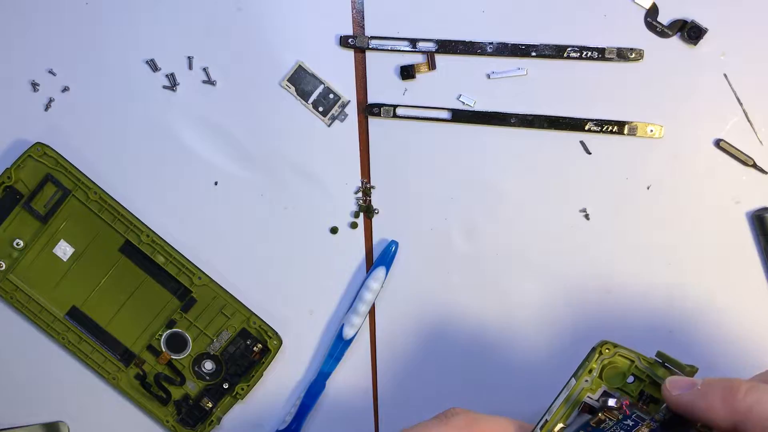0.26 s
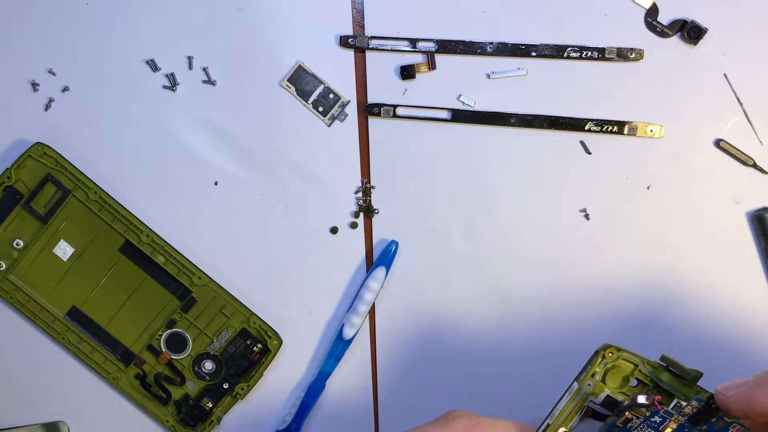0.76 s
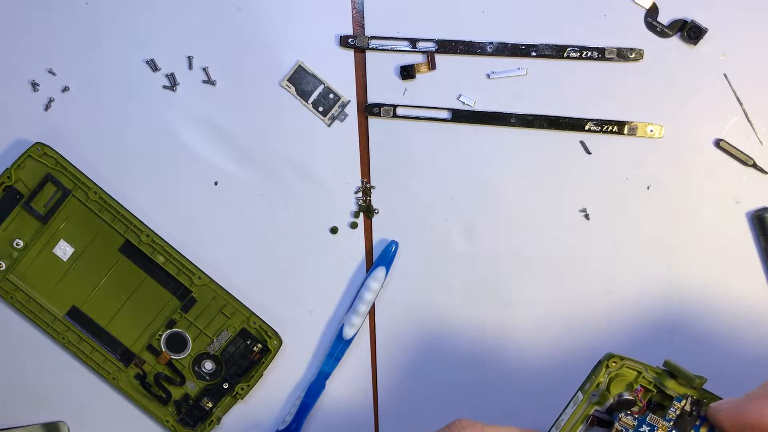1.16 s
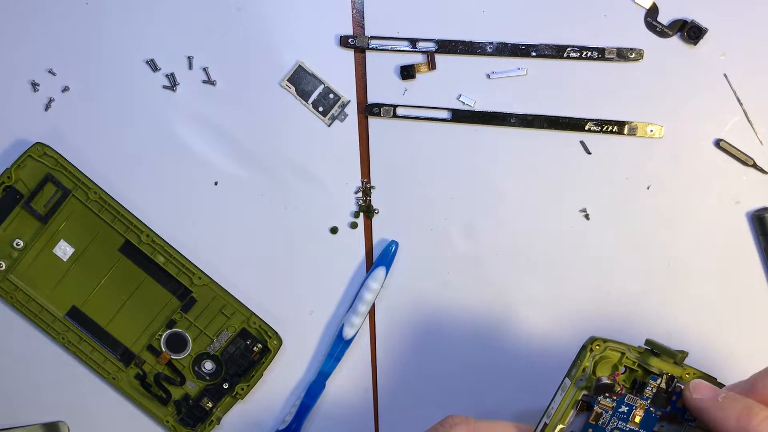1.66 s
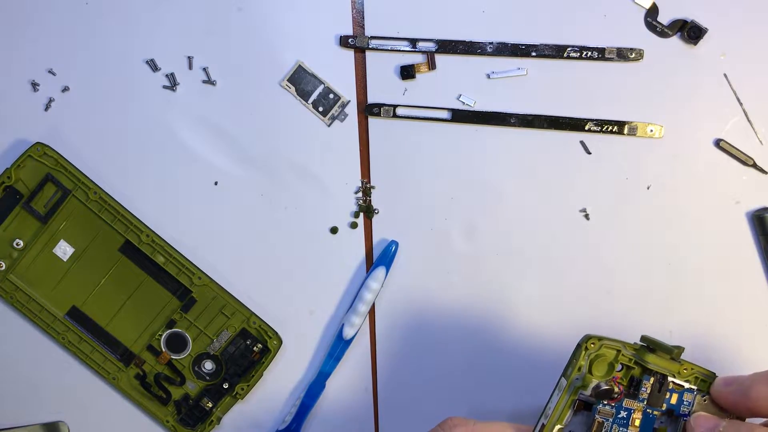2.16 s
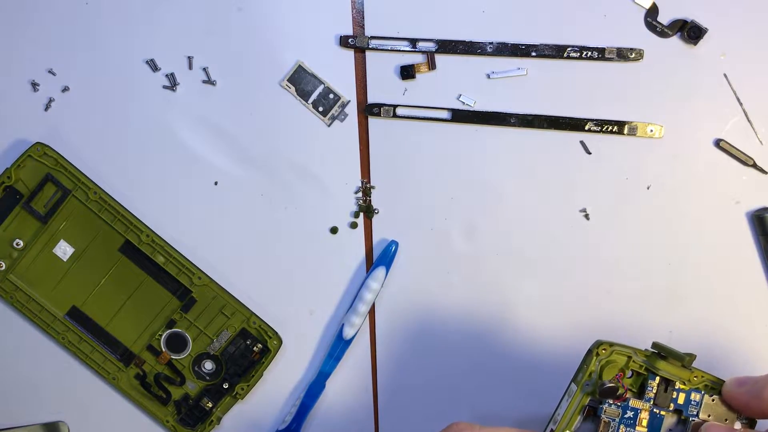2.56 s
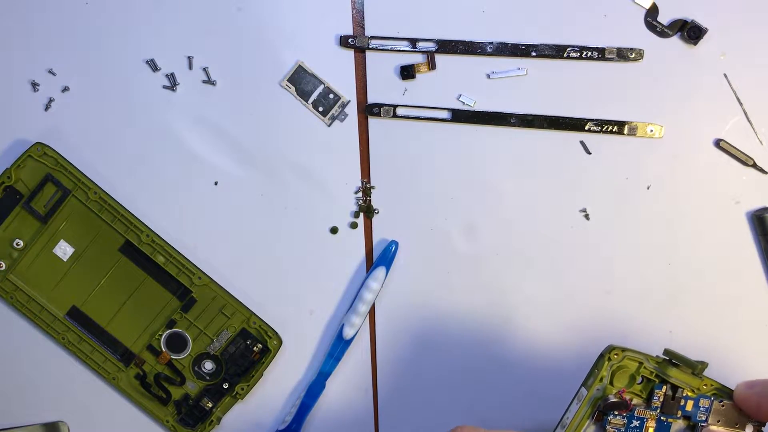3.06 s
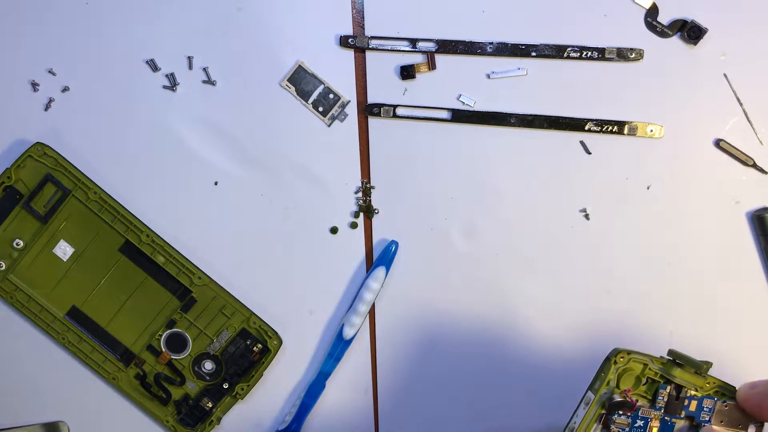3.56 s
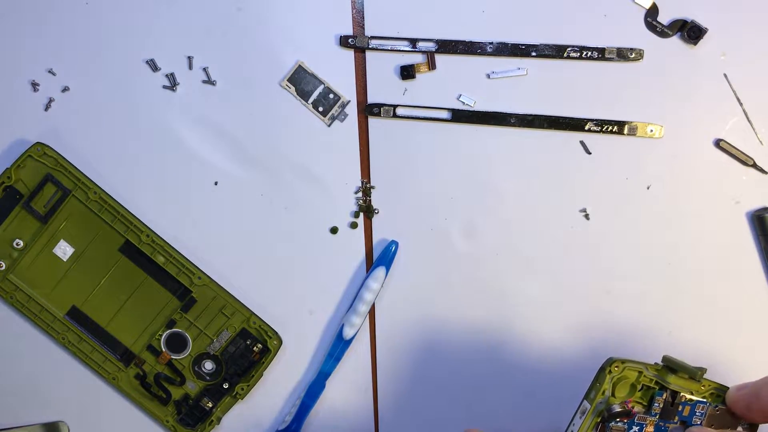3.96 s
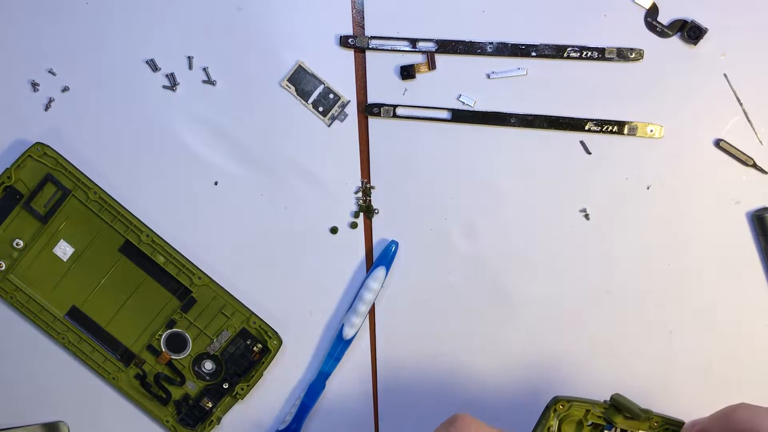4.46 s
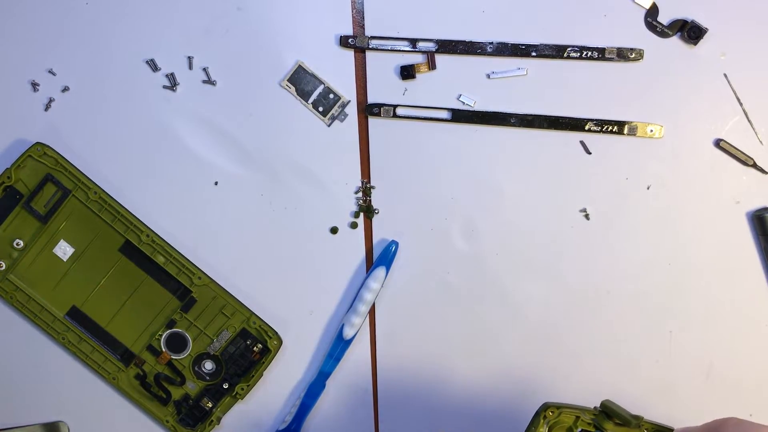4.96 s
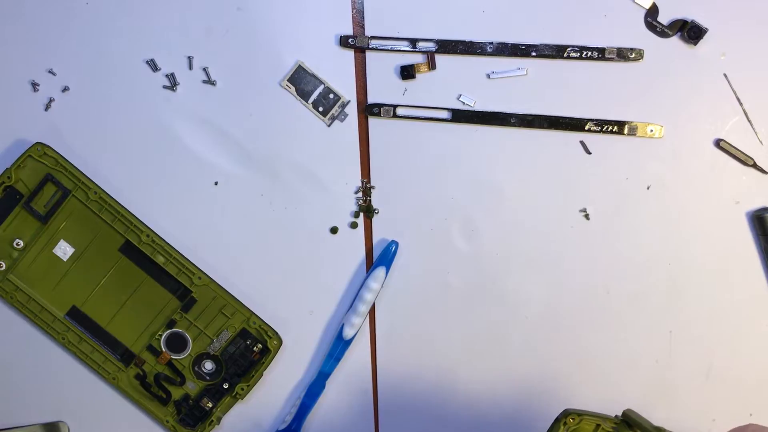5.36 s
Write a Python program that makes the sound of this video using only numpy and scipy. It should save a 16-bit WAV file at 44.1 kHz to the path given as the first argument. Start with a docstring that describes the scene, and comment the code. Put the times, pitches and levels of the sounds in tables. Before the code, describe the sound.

An opened phone is handled on a desk, close to the microphone, in a small room with little echo. A steady low electrical hum and soft hiss run throughout. A dull desk bump and a faint tick open the sound, and a few light ticks follow from 0.5 seconds. At 0.7 seconds the plastic frame lets go with one sharp snap, by far the loudest event. Fingers briefly rub the plastic as it settles with soft knocks. Small parts click in a quick cluster from 1.0 to 1.2 seconds. More ticks come between 1.6 and 2.1 seconds, mixed with short, high pings from thin metal and ending in a crisper click. From 3 seconds there are only scattered faint ticks, with soft low desk bumps around 4.1 seconds. The room noise swells slightly towards the end, at about 5.6 seconds.

```python
"""The plastic frame of an opened phone lets go with one sharp snap as its catch slips and lands.
The phone is worked by hand on a desk, close by: small parts tick against the frame, a thin metal
shield rings, the frame settles with soft knocks and fingers rub over it. Behind it are a mains hum,
the low drone of a machine, a faint electronic whine and soft room noise that swells towards the end."""
import sys
import numpy as np
from scipy import signal
from scipy.fft import rfft, irfft, next_fast_len
from scipy.io import wavfile
from scipy.ndimage import map_coordinates

SR = 44100
rng = np.random.default_rng(int(sys.argv[2]) if len(sys.argv) > 2 else 0)


def log_audio(samples):
    """Write samples as a 16-bit WAV file to the path given in sys.argv[1]."""
    # one column per channel
    frames = np.atleast_2d(samples).T
    # limit to full scale, then quantise
    limited = np.clip(frames, -1, 1)
    pcm = np.round(limited * 32767).astype(np.int16)
    wavfile.write(sys.argv[1], SR, pcm)


N = 247842
TIME = np.arange(N) / SR
RING_TIME = np.arange(SR // 4) / SR  # the quarter second in which one contact dies away


def amp(db):
    """Turn decibels into a number to multiply by."""
    return 10 ** (np.asarray(db) / 20)


def unit(x):
    """Scale a sound to an average (rms) level of 1."""
    return x / np.sqrt(np.mean(x ** 2) + 1e-20)


def fade(t, fade_s):
    """Die away by 60 dB in fade_s seconds; every fade time here means this."""
    return np.exp(-np.log(1000) * t / np.maximum(fade_s, 1e-3))


def along(points, hz):
    """Read between (frequency, value) points, giving each octave equal room."""
    freqs, values = np.transpose(points)
    return np.interp(np.log(hz + 1), np.log(freqs), values)


def resonances(peaks, hz, scatter_db=0):
    """The boost in dB near the pitches an object favours; scatter varies their strengths."""
    return sum((boost + scatter_db * rng.standard_normal()) / (1 + (2 * (hz - centre) / width) ** 2)
               for centre, width, boost in peaks)


def wobble(rate):
    """A smooth curve through `rate` random values a second."""
    return map_coordinates(rng.standard_normal(int(N * rate / SR) + 4), [TIME * rate])


def filtered(x, gain):
    """Multiply each frequency of a sound by gain(frequency)."""
    size = next_fast_len(len(x) + SR // 4)
    return irfft(rfft(x, size) * gain(np.fft.rfftfreq(size, 1 / SR)), size)[:len(x)]


def coloured(x, colour_db):
    """Shape the tone with no sound ahead of the hit (minimum phase), so clicks stay sharp."""
    size = 2 * next_fast_len(len(x))
    gain = amp(colour_db(np.fft.rfftfreq(size, 1 / SR)))
    cepstrum = irfft(np.log(gain + 1e-5))
    cepstrum[1:size // 2] *= 2
    cepstrum[size // 2 + 1:] = 0
    return irfft(rfft(x, size) * np.exp(rfft(cepstrum)))[:len(x)]


def noise(colour):
    """Steady noise with the given tone colour and an average level of 1."""
    return unit(filtered(rng.standard_normal(N), lambda hz: amp(along(colour, hz))))


def add(track, start_s, sound):
    """Mix a sound into the track at the given time."""
    part = track[round(start_s * SR):][:len(sound)]
    part += sound[:len(part)]


def jolt(slip_s, rattle_db, first_db):
    """The force of a contact: one clean first blow, a burst of slips and a weak, longer rattle."""
    slips = fade(RING_TIME, slip_s)
    rattle = amp(rattle_db) * fade(RING_TIME, .045)
    force = rng.standard_normal(len(RING_TIME)) * (slips + rattle)
    force /= np.linalg.norm(force)
    force[0] += amp(first_db)
    return force


def click(x):
    """Scale a click so that its energy, spread over 7 ms, has a level of 0 dB."""
    return x * np.sqrt(0.007 * SR) / np.linalg.norm(x)


def rings(knocks, notes):
    """Light knocks ring an object's own notes, each time at new strengths."""
    out = np.zeros(N)
    onset = 1 - fade(RING_TIME, 0.0026)
    for start_s, db in knocks:
        ring = sum(amp(note_db + rng.normal(0, 2.2)) * fade(RING_TIME, fade_s)
                   * np.sin(2 * np.pi * hz * RING_TIME) for hz, note_db, fade_s in notes)
        add(out, start_s, amp(db) * ring * onset)
    return out


# tone colour of the even hiss (frequency [Hz], relative level [dB])
HISS_COLOUR = [(100, -32.5), (170, -3), (295, -6), (325, -6.5), (371, -6.5), (448, -13.5), (522, -12),
               (1230, -13.5), (1350, -15), (2580, -21.5), (4830, -28.5), (5950, -27), (10500, -50),
               (14500, -45.5), (16000, -41)]
# tone colour of the distant wash (frequency [Hz], relative level [dB])
WASH_COLOUR = [(300, -18.5), (480, -7), (620, -2.5), (850, 0), (1220, -1), (1500, -6), (2200, -16),
               (4000, -25), (8000, -45.5)]
# shape of the wash's swell, before it is widened (time [s], relative level [dB])
WASH_SWELL = [(0.0, -67), (0.91, -67), (1.3, -69), (3.11, -69.5), (5.34, -66.5), (5.62, -63.5)]
# pitches the room boosts or weakens (frequency [Hz], width [Hz], boost [dB])
ROOM_PEAKS = [(619.6, 60, 4), (810, 22, 4), (1260, 29, 3), (2010, 34, 3), (6800, 570, 5), (10384, 800, -5),
              (12895, 900, 1)]
def room_noise(quietest_wash_db=-73, widen=1.6):
    """An even hiss and a distant wash that slowly swells; the room colours both."""
    swell = np.interp(TIME, *np.transpose(WASH_SWELL))
    wash = amp(quietest_wash_db + widen * (swell - swell.min())) * noise(WASH_COLOUR)
    hiss = amp(-66.5) * noise(HISS_COLOUR)
    return filtered(hiss + wash, lambda hz: amp(resonances(ROOM_PEAKS, hz)))


# mains and machine tones (frequency [Hz], average level [dB], unsteadiness [higher wavers more])
HUM_TONES = [(49.3, -60.5, 2.5), (51, -56.5, 4.5), (99.35, -52.5, 2), (145.6, -66.5, 3), (159.6, -72.5, 2),
             (197, -75, 2), (300, -79, 0.5)]
# tone colour of the machine's drone (frequency [Hz], relative level [dB])
DRONE_COLOUR = [(15, -45.5), (24, -20), (33, -5.5), (45, -3.5), (54, 4.5), (60, 0.5), (68, -9), (85, -8),
                (100, -4), (115, -6), (128, -19), (148, -14.5), (175, -24), (260, -50.5)]
def hum():
    """Mains and machine tones waver in loudness and pitch over a low drone."""
    tones = np.zeros(N)
    for hz, db, unsteadiness in HUM_TONES:
        loudness = amp(db + unsteadiness * wobble(7.0) / 2)
        phase = 2 * np.pi * (hz * TIME + rng.random())
        drift = 0.16 * unsteadiness * wobble(3.5)
        tones += loudness * np.sqrt(2) * np.sin(phase + drift)
    return tones + amp(-53.5) * noise(DRONE_COLOUR)


# thin electronic tones (frequency [Hz], average level [dB])
WHINE_TONES = [(11526, -95), (14406, -95)]
def whine():
    """The electronics sing very faintly on high, steady notes."""
    return sum(amp(db) * np.sqrt(2) * np.sin(2 * np.pi * hz * TIME) for hz, db in WHINE_TONES)


# how long the room's echo lasts (frequency [Hz], fade time [s])
ECHO_FADES = [(300, .25), (2000, .3), (7000, 0.3), (15000, .16)]
def room_echo(x):
    """The small room answers 5 ms later; the highest treble dies first."""
    hz, t, spectrum = signal.stft(rng.standard_normal(SR // 2), SR, nperseg=256)
    spectrum *= fade(t, along(ECHO_FADES, hz)[:, None])
    tail = signal.istft(spectrum, SR, nperseg=256)[1]
    tail = np.pad(tail / np.linalg.norm(tail), (SR // 200, 0))
    return signal.fftconvolve(x, tail)[:N]


# the hand shifts on the desk (time [s], level [dB], frequency [Hz])
DESK_PUSHES = [(0.017, -37, 48.7), (1.452, -44, 51.1), (4.083, -42.5, 91.9), (4.09, -45, 40),
               (4.172, -39.5, 55)]
def desk_bumps():
    """Each soft push shakes the desk for a few slow swings."""
    return sum(amp(db) * np.exp(-((TIME - s) / 0.033) ** 2) * np.sin(2 * np.pi * hz * (TIME - s))
               for s, db, hz in DESK_PUSHES)


def stroke(start_s, length_s):
    """A finger takes hold, drags evenly and lets go; a long stroke does so more gently."""
    t = TIME - start_s
    grip = np.clip(t / (.12 * length_s), 0, 1)
    release = fade(np.maximum(t - length_s, 0), 1.7 * length_s)
    return grip * release


# fingers grip, skid, scuff, turn the phone and draw it aside (start [s], length [s], level [dB])
FINGER_STROKES = [(0.49, 0.2, -68.5), (0.708, 0.06, -52), (0.78, 0.06, -60), (0.837, 0.018, -59.5),
                  (0.84, 0.32, -67.5), (2.062, 0.043, -65.5), (2.097, 0.25, -74.5), (4.85, 0.54, -78.5)]
# tone colour of skin on plastic (frequency [Hz], relative level [dB])
RUB_COLOUR = [(700, -30), (1300, -10), (2000, -4.5), (2600, -4.5), (3150, -7), (4100, -2.5), (5500, -9),
              (6500, -5), (8200, -9.5), (9600, -10), (10500, -14.5), (13000, -12), (16000, -18)]
def finger_rub():
    """Fingers drag in a fine, uneven grain that mildly sounds the same frame pitches as the snap."""
    grain = rng.standard_normal(N)
    grain *= amp(3 * rng.standard_normal(N) + 1.7 * wobble(110))
    friction = filtered(grain, lambda hz: amp(along(RUB_COLOUR, hz) + .63 * resonances(FRAME_PEAKS, hz)))
    return unit(friction) * sum(amp(db) * stroke(start, length) for start, length, db in FINGER_STROKES)


# soft knocks after the snap (time [s], level [dB])
SETTLING_KNOCKS = [(0.759, -53), (0.765, -53), (0.825, -51), (0.844, -52), (0.854, -49.5), (1.021, -51),
                   (1.031, -50)]
# the case's own notes (frequency [Hz], relative level [dB], fade time [s])
CASE_NOTES = [(1770, -8, 0.066), (2455, -3, 0.055), (4150, -1, 0.041), (6400, -2, 0.038)]
def frame_settling():
    """The frame settles in soft knocks that ring the case."""
    return rings(SETTLING_KNOCKS, CASE_NOTES)


# taps on the metal shield (time [s], level [dB])
SHIELD_TAPS = [(1.732, -58), (1.856, -60), (1.873, -57.5), (1.9276, -47), (1.973, -59), (1.983, -56),
               (2.06, -53), (2.0848, -51)]
# the shield's own notes (frequency [Hz], relative level [dB], fade time [s])
SHIELD_NOTES = [(5300, -13.5, .02), (6000, -0.5, 0.042), (6550, -5, 0.028)]
def shield_pings():
    """Light taps set a thin metal shield ringing, high and short."""
    return rings(SHIELD_TAPS, SHIELD_NOTES)


# parts drop into place (time [s], level [dB], extra body [dB], extra edge [dB], wait after touch [s])
PART_CONTACTS = [(0.0403, -58.5, 5, -2, 0.013), (0.4927, -55.5, 8.5, -9, 0.0026),
                 (0.5262, -47.5, 6, -5, 0.0042), (0.651, -59, 7, -13, 0.022), (0.6709, -58.5, 8, -16, 0),
                 (0.6838, -53, 7, -10, 0), (1.0234, -48, 12, 5.5, 0.0048), (1.0326, -56.5, 24, -6, 0.0016),
                 (1.0628, -47.5, 9, 12, 0.0058), (1.105, -60, 3, -2, 0.0041), (1.1334, -43, 12, 9, 0),
                 (1.1461, -39.5, -2, 0.5, 0), (1.19, -47, 1, -8, .0154), (1.201, -55, -1, -2.5, 0),
                 (1.653, -60, 6.5, -2, 0.0052), (1.6699, -45.5, -1.5, -2, 0.00069),
                 (1.7181, -57, 6, 0.5, 0.013), (1.7313, -58.5, -3, -10, 0.002), (1.8725, -57, 7, -5, 0.022),
                 (1.937, -62, 31, -15.5, 0), (1.9816, -59, 6.5, -1.5, 0.015), (2.0576, -37, -2, 2.5, .0034),
                 (2.0613, -44.5, 1.5, -2, 0.00057), (2.0842, -52, 0, 0, 0.0087), (3.147, -59, 3, 6, 0.0025),
                 (3.684, -63.5, 11, 4.5, 0), (3.8154, -64, 8, -1, 0.00039),
                 (4.1674, -64.5, 11.5, -5.5, 0.01), (4.194, -65, 8, -12, 0), (4.3954, -64.5, 12, 3, .017),
                 (5.0421, -60, 25, 0, 0)]
# tone colour of a tick (frequency [Hz], relative level [dB])
TICK_COLOUR = [(400, -28), (1000, -15.5), (2300, -13), (4200, -11.5), (5000, -4), (6500, -0.5), (7500, -8),
               (8700, -2.5), (10500, -7.5), (13000, -3.5), (15800, -8)]
# pitches the small parts favour (frequency [Hz], width [Hz], boost [dB])
PART_PEAKS = [(2210, 120, 7), (4590, 110, 11), (5320, 200, 7), (6006, 160, 12), (6590, 110, 8.5),
              (7960, 120, 6), (8460, 140, 7.5), (8900, 150, 6.5), (9450, 200, 8), (11400, 140, 3.5),
              (12330, 110, 8)]
def part_ticks(touch_db=-6.5):
    """Small parts touch the frame, then drop into place; firm contacts have more body, hard more edge."""
    out = np.zeros(N)
    for time_s, db, body_db, edge_db, wait_s in PART_CONTACTS:
        tilt = [(3300, body_db), (5700, 0), (8000, 0), (11000, edge_db)]  # (frequency [Hz], boost [dB])
        slip_s = .019 + .0005 * body_db  # a firm contact slips longer
        for start_s, level_db in (time_s - wait_s, db + touch_db), (time_s, db):
            force = jolt(slip_s, rattle_db=-21, first_db=-7)
            # each contact point brings out different pitches
            tick = coloured(force, lambda hz: along(TICK_COLOUR, hz) + along(tilt, hz)
                            + resonances(PART_PEAKS, hz, scatter_db=2.5))
            add(out, start_s, amp(level_db) * click(tick))
    return out


# the snap's knock on the phone's body (time [s], level [dB])
BODY_KNOCK = [(0.7031, -22.5)]
# the body's own note (frequency [Hz], relative level [dB], fade time [s])
BODY_NOTE = [(620.2, -27, .045)]
def body_thud():
    """The snap jolts the phone's body, which rings briefly on one note."""
    return rings(BODY_KNOCK, BODY_NOTE)


# the catch slips twice, then lands (time [s], level [dB], fade time of the slip [s])
CATCH_HITS = [(0.7027, -23.5, .01), (0.7031, -19.5, .014), (0.7087, -32, .025)]
# tone colour of the plastic's crack (frequency [Hz], relative level [dB])
CRACK_COLOUR = [(400, -34), (630, -20), (850, -27), (1250, -17), (1750, -16), (2450, -8.5), (3100, -13.5),
                (3950, 1), (5500, -13), (6600, -3), (8100, -11), (9300, -9), (10400, -16.5), (12400, -9),
                (15800, -18)]
# pitches the plastic frame favours (frequency [Hz], width [Hz], boost [dB])
FRAME_PEAKS = [(635, 51, 12.5), (1100, 190, 11.5), (1256, 96, 8.5), (1694, 260, 10.5), (2265, 94, 10.5),
               (2480, 150, 7), (2730, 50, 6), (3182, 60, 7.5), (3304, 60, 8), (3640, 62, 9), (3930, 110, 6),
               (4144, 90, 8), (4250, 120, 4.5), (4623, 87, 8), (4574, 60, 6), (4840, 51, 7.5),
               (5282, 90, 7), (5900, 80, 6.5), (5990, 71, 12), (6650, 97, 5.5), (6680, 80, 6.5),
               (7022, 92, 9.5), (7090, 83, 9.5), (7350, 90, 8.5), (7250, 56, 7), (9676, 230, 9),
               (11030, 110, 9), (12330, 130, 5.5), (13414, 200, 7)]
def frame_snap():
    """The catch slips and lands, sending a sharp crack through the plastic frame."""
    out = np.zeros(N)
    for start_s, db, slip_s in CATCH_HITS:
        force = jolt(slip_s, rattle_db=-12.5, first_db=-1)
        crack = coloured(force, lambda hz: along(CRACK_COLOUR, hz) + resonances(FRAME_PEAKS, hz))
        add(out, start_s, amp(db) * click(crack))
    return out


def scene():
    """The phone's sounds and their faint echo, over desk bumps and the background, in one channel."""
    phone = frame_snap() + body_thud() + part_ticks() + shield_pings() + frame_settling() + finger_rub()
    background = room_noise() + hum() + whine()
    return (phone + amp(-26.0) * room_echo(phone) + desk_bumps() + background)[None]


def record(dry, top_hz=15900):
    """Cut away the very highest treble, steeply above top_hz."""
    return np.array([filtered(x, lambda hz: 1 / (1 + (hz / top_hz) ** 160)) for x in dry])


dry = scene()
out = record(dry)
log_audio(out)
```